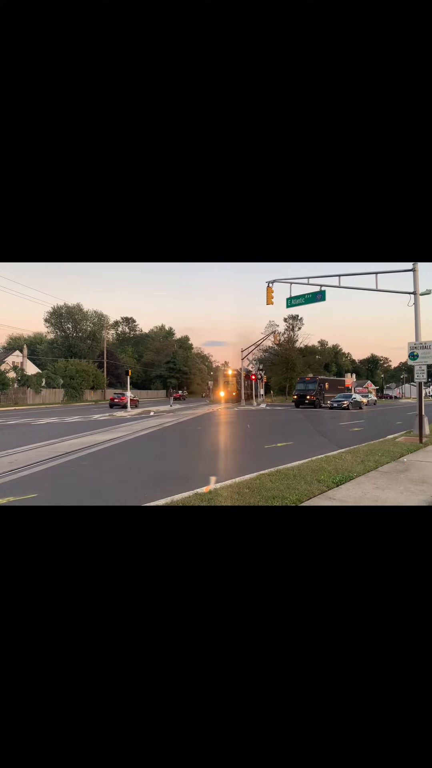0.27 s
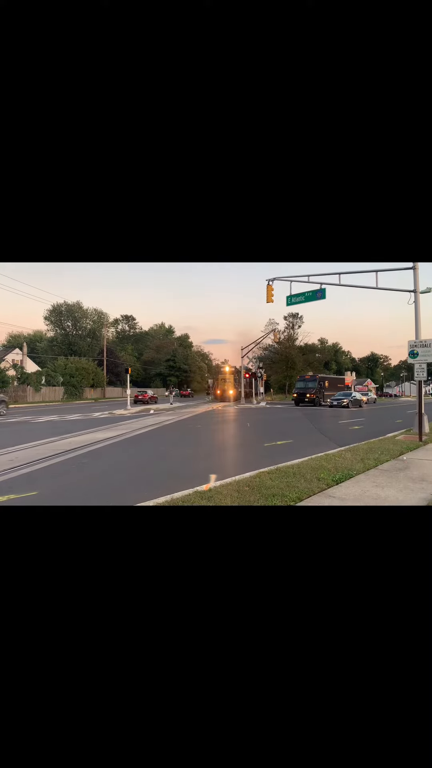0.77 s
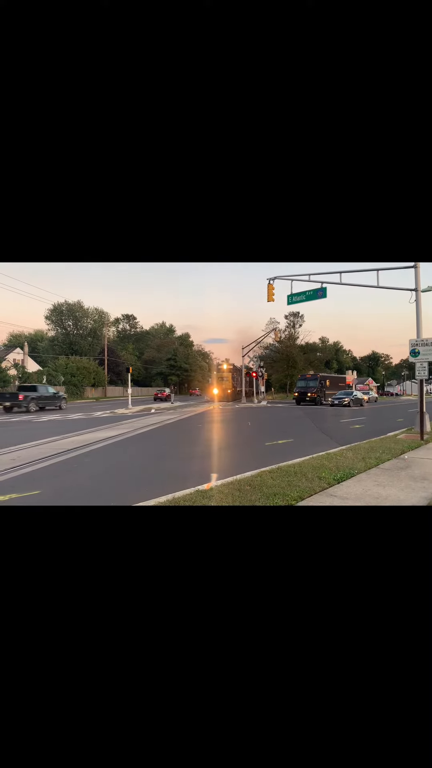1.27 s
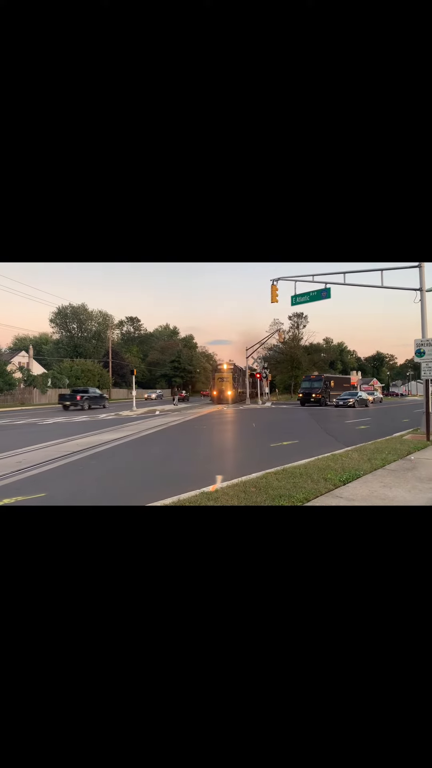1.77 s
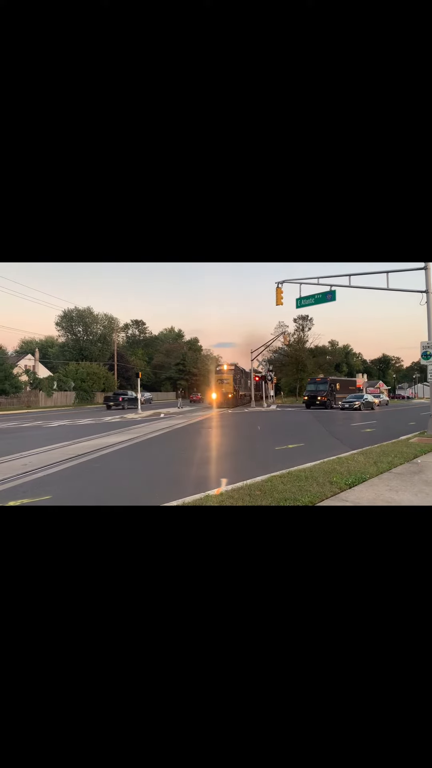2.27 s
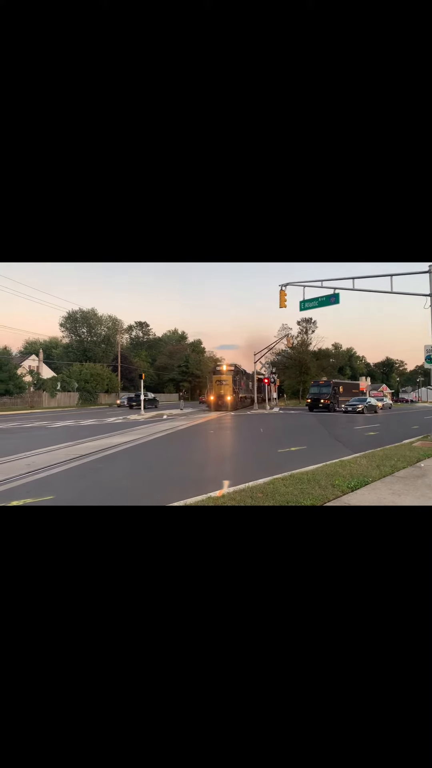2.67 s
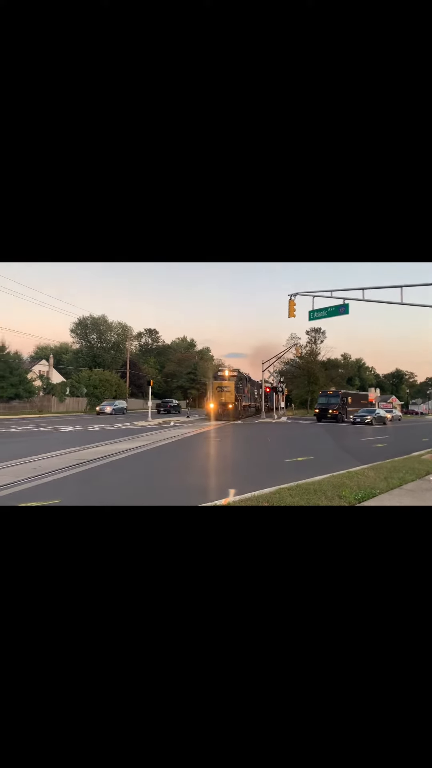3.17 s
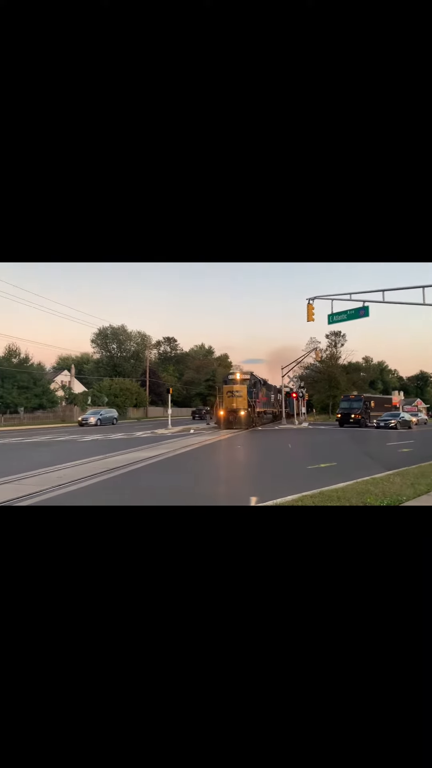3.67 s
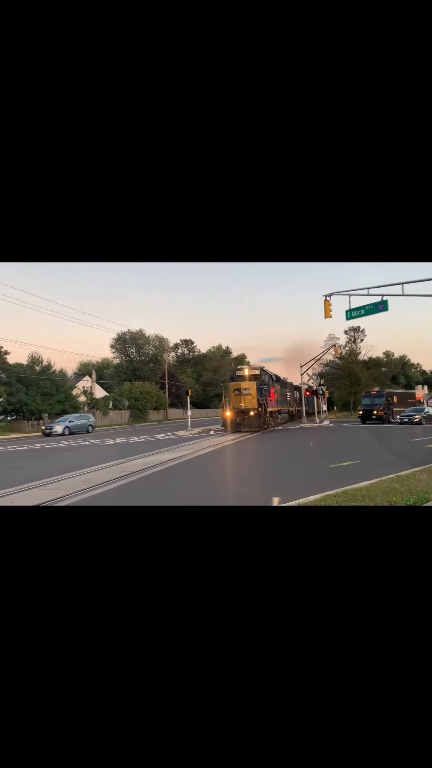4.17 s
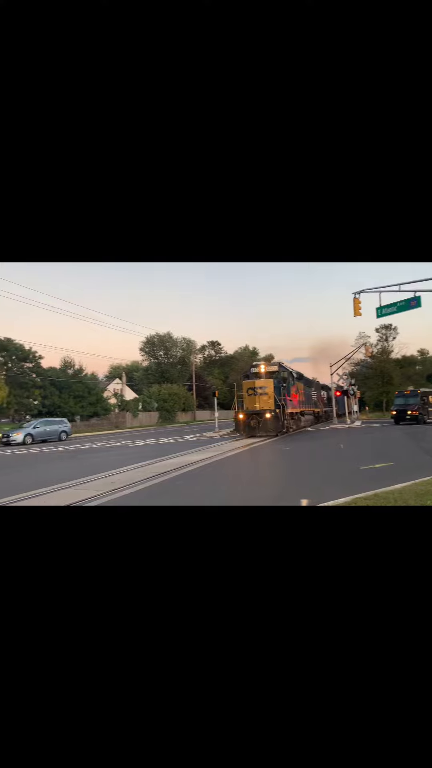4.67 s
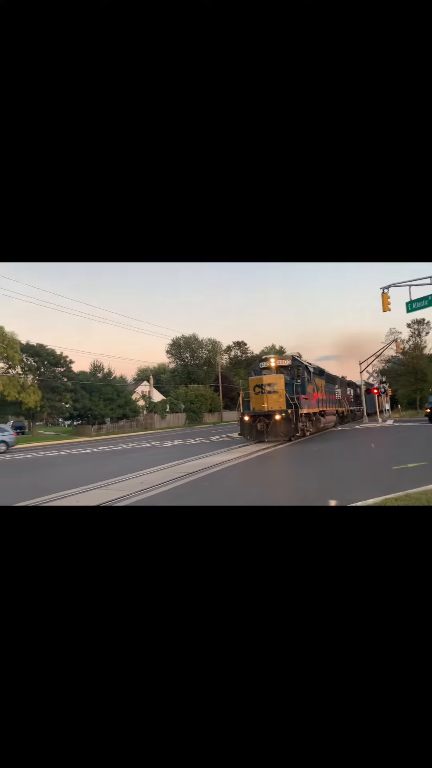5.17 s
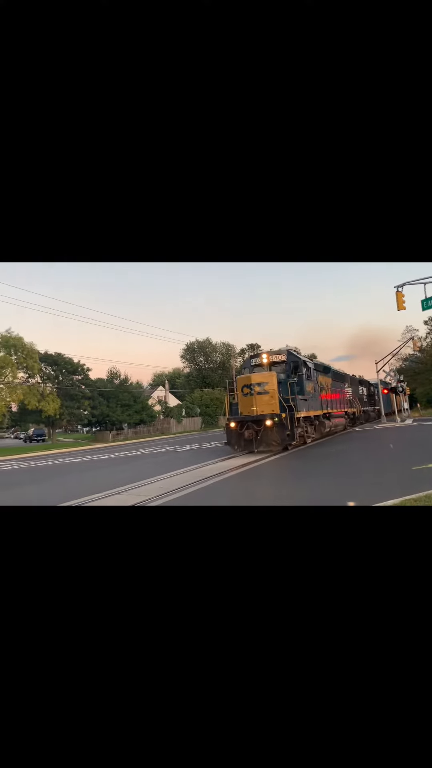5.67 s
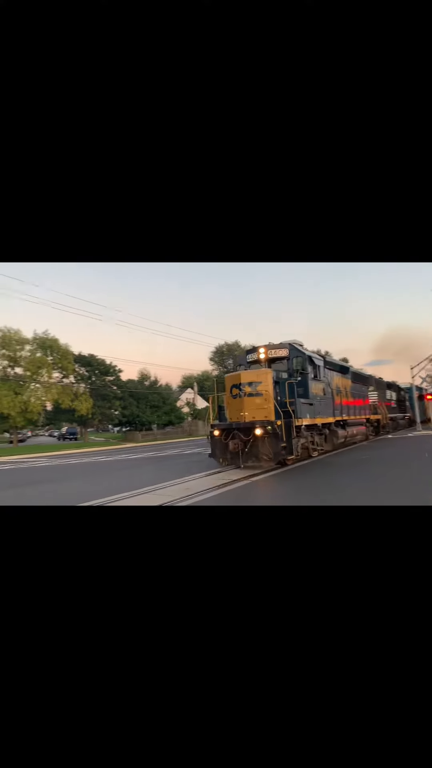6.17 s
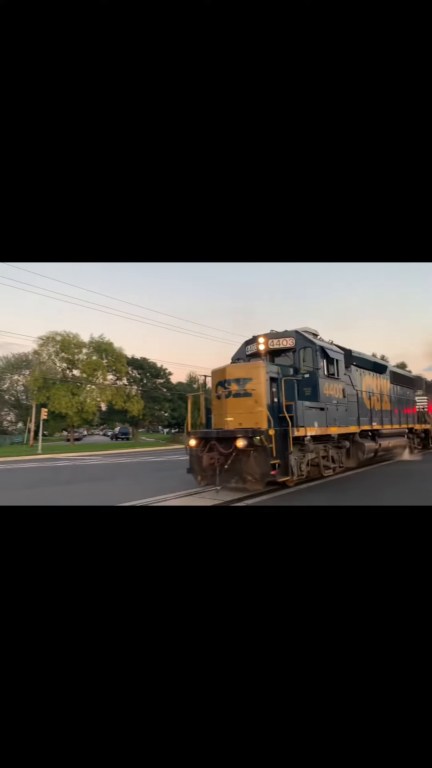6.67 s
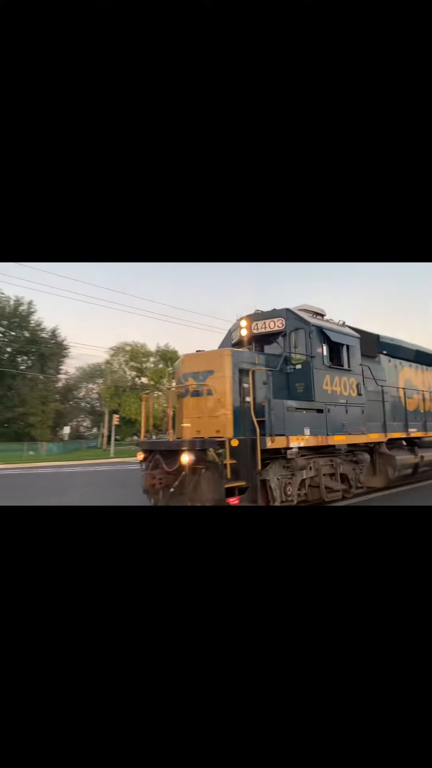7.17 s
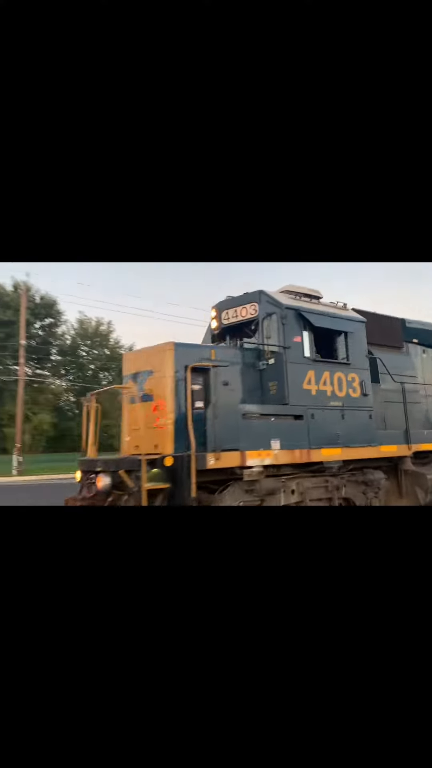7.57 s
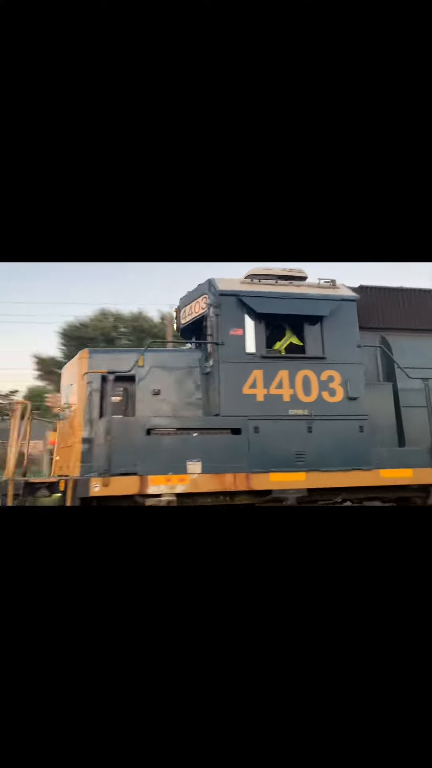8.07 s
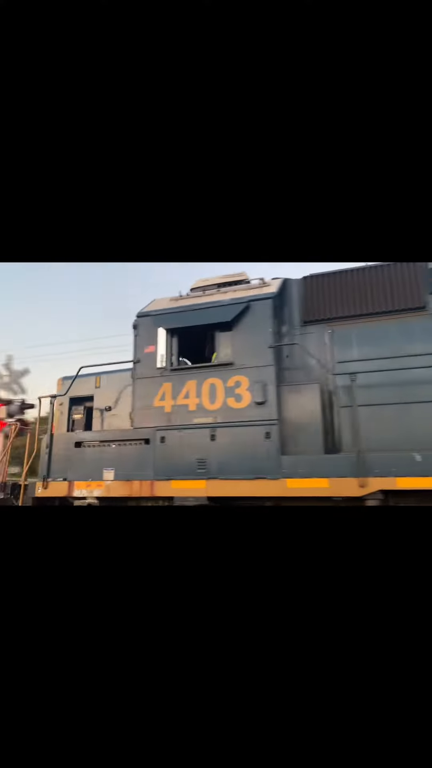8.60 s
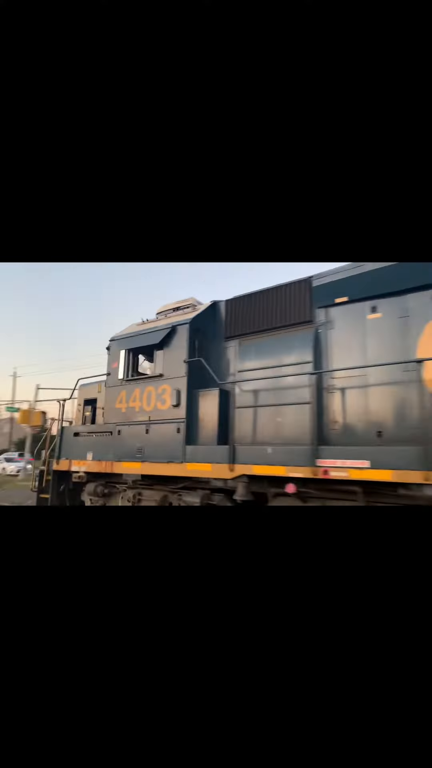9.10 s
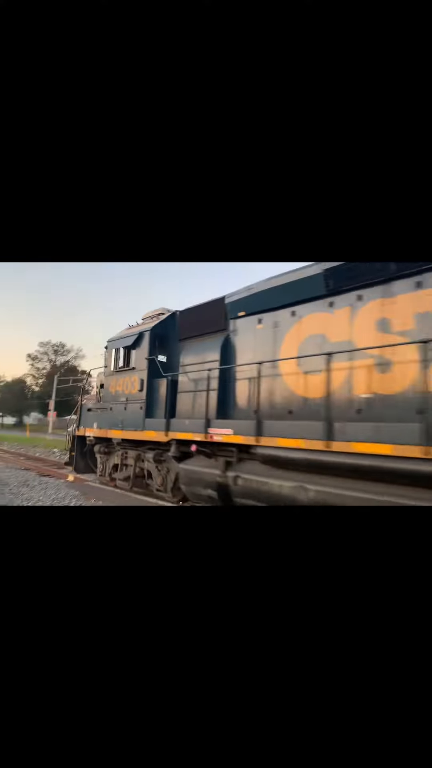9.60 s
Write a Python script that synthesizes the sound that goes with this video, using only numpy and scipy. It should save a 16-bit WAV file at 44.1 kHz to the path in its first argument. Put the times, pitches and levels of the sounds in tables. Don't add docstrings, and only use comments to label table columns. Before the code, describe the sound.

A diesel locomotive throbs closer with a short horn toot, tolling bell and crossing gongs, then a long chordal horn blast before rumbling past with hissing air.

```python
import sys
import numpy as np
from scipy import signal
from scipy.io import wavfile
from scipy.ndimage import uniform_filter1d

SR = 44100
rng = np.random.default_rng(int(sys.argv[2]) if len(sys.argv) > 2 else 0)


def invert_db(level):
    return 10 ** (np.asarray(level, dtype=float) / 20)


def wav_record(signal):
    frames = np.transpose(np.atleast_2d(signal))
    bounded = np.clip(frames, -1, 1)
    quanta = np.round(bounded * 32767).astype(np.int16)
    wavfile.write(sys.argv[1], SR, quanta)


N = 433944
T = np.arange(N) / SR


def evened(x):
    return x / np.sqrt(np.mean(abs(x) ** 2) + 1e-20)


def over_time(points, t):
    return np.interp(t, *np.transpose(points))


def read(points, hz):
    f, *values = np.transpose(points)
    return np.squeeze([np.interp(np.log(hz + 1), np.log(f), v) for v in values])


def joined(*levels_db):
    return 10 * np.log10(sum(invert_db(2 * db) for db in levels_db) + 1e-14)


def dying(t, s, db, db_per_s):
    return np.where(t < s, -120., db - db_per_s * (t - s))


def tone(hz, rough, width_hz):
    count = len(hz) // 32 + 2
    z = rng.standard_normal((count, 2)) + 1j * rng.standard_normal((count, 2))
    pole = np.exp(-np.pi * width_hz * 32 / SR)
    for _ in range(2):
        z = signal.lfilter([1], [1, -pole], z, axis=0)
    share = np.clip(rough, 0, 1)
    z = evened(z) * [np.sqrt(share), 1] + [np.sqrt(1 - share), 0]
    slow = np.array([np.interp(np.arange(len(hz)) / 32, np.arange(count), row) for row in z.T])
    phase_turns = np.cumsum(hz) / SR + rng.random()
    return np.sqrt(2) * (slow * np.exp(2j * np.pi * phase_turns)).real


# time in seconds, level in dB.
EXHAUST_LEVEL = [(0, -16), (.08, -14.5), (.45, -15), (2.6, -13.5), (3.45, -12), (4, -13.5), (4.9, -14),
                 (5.6, -6.5), (5.9, -7), (7.2, -7.5), (7.75, -7), (8.2, -6), (8.8, -5.5), (9.25, -7),
                 (9.56, -7), (9.84, -6)]


def train(t):
    exhaust_db = over_time(EXHAUST_LEVEL, t)
    near = np.interp(t, [6, 7.6], [0, 1])
    return exhaust_db, near, exhaust_db - 14 + 4 * near


# multiple of the cycle rate, level in dB.
EXHAUST_ORDERS = [(6, -30), (7, -19), (8, 0), (9, -10), (10, -15), (11, -13), (12, -26), (13, -9),
                  (14, -19), (15, -25), (16, -23), (17, -22), (21, -28), (24, -26), (30, -30)]
# time in seconds, rate in Hz.
FIRING = [
    (0, 65.7),
    (6.5, 65.8),
    (8, 64.8),
    (9.84, 64),
]
# start in seconds, end in seconds.
FRAME_BOOMS = [
    (7.25, 8.4),
    (9.15, 10),
]
# frequency in Hz, width in Hz, level in dB over the rumble.
WHINES = [(654.7, 19.7, -10), (1010, 2.7, -29)]


def engine():
    t = np.arange(N // 16 + 1) * 16 / SR
    fast_hz = 16 * over_time(FIRING, t)
    exhaust_db, near, _ = train(t)
    others_db = -4.5 * near
    lope_depth, lope_turns = 0.35, 0.89
    lope = lope_depth * np.cos(2 * np.pi * (np.cumsum(fast_hz / 8) / SR - lope_turns))
    orders = 0
    for order, db in EXHAUST_ORDERS:
        level = invert_db(db) * (1 + lope) if order == 8 else invert_db(db + others_db)
        orders = orders + level * tone(fast_hz * order / 8, rough=.07, width_hz=30.)
    booms = sum(np.clip(np.minimum(t - a, b - t) / 0.067, 0, 1) for a, b in FRAME_BOOMS)
    hum_db, hum_rest_db = -9, -12
    hum = invert_db(hum_db + hum_rest_db * (1 - booms)) * tone(2.12 * fast_hz, rough=0.91, width_hz=90.0)
    low = invert_db(exhaust_db) * (invert_db(1.4) * evened(orders) + hum)
    low = signal.resample_poly(low, 16, 1, axis=1)[:, :N]
    doppler = over_time(FIRING, T) / FIRING[0][1]
    whines = sum(invert_db(db) * tone(hz * doppler, rough=0.75, width_hz=width) for hz, width, db in WHINES)
    return low + invert_db(train(T)[2]) * whines


SHUT_DB_PER_S = 187.5


def blast_db(t, start, shut, db):
    attack_s, swell_db, swell_s = 0.034, 7, 0.31
    swell = np.clip((np.minimum(t, shut) - start) / swell_s, 0, 1)
    attack_db = -30 * np.clip(1 - (t - start) / attack_s, 0, 4)
    return db + attack_db + swell_db * swell, np.maximum(t - shut, 0)


WALL_S = .19


def release_db(after, tail_db):
    wall_db = -9.5 - 32 * after - SHUT_DB_PER_S * np.maximum(after - WALL_S, 0)
    return joined(-SHUT_DB_PER_S * after, wall_db, tail_db - 19 * after)


# start in seconds, valve shuts in seconds, level in dB, low fundamentals in dB,
# street tail in dB.
BLASTS = [
    (0.055, 0.165, -21.5, 1, -14.5),
    (3.435, 4.619, -13.5, -8, -19),
]
# scattered share 0-1, width in Hz.
SCATTER = [
    (.42, 15),
    (.1, 9),
]
# fundamental in Hz, levels of partials 1 to 5 in dB.
CHIMES = [(317.1, -14, 0.5, -14.5, -15, -25.5), (373.3, -9.5, -1, -21, -23.5, -27),
          (430.4, -11.5, -10.5, -18, -26, -26.5), (499.6, -8, -18, -16.5, -30, -27),
          (627.4, -2.5, -17.5, -18, -46, -41)]
# seconds into the blast, pitch factor.
ECHO_PITCH = [(0, .995), (.4, .98), (1.4, .968)]
# frequency in Hz, level in dB.
ECHO_COLOUR = [(300, -1), (700, -6), (1100, -4.5), (1460, 2.5), (1900, 3.5), (3000, -11)]
# time in seconds, level in dB.
SURGES = [(.16, 2), (.33, 5), (.43, 8), (.526, 12), (3.487, 2), (3.742, 4), (3.86, 6.5), (3.968, -0.5),
          (4.326, 3.5), (4.41, 1.5)]


def horn(start, shut, blast, low_db, tail_db, rough, width_hz):
    t = np.arange(start, shut + 0.54, 1 / SR)
    held_db, after = blast_db(t, start, shut, blast)
    level_db = held_db + release_db(after, tail_db)
    surge_db = sum(db * np.exp(-((t - s) / 0.02) ** 2) for s, db in SURGES)
    linger_db = 4.5 * np.clip(after / WALL_S * 2, 0, 1)
    age = t - t[0]
    pitch = 1 + 0.0266 * np.exp(-age / 0.065)
    late = over_time(ECHO_PITCH, age)
    onset = np.clip((age - .12) / 0.038, 0, 1)
    out = np.zeros((2, len(t)))
    for hz, *partials in CHIMES:
        brassy = [partials[-1] - 2.5 * n for n in (1, 2)]
        for k, db in enumerate(partials + brassy, 1):
            direct = tone(k * hz * pitch, rough, width_hz)
            echo_level = invert_db(read(ECHO_COLOUR, k * hz)) * onset
            echo = echo_level * tone(k * hz * late, rough=.35, width_hz=9.)
            lift_db = low_db + 7.5 + linger_db if k * hz < 560 else surge_db
            if k * hz > 900:
                lift_db = lift_db + 7 * np.exp(-age / 0.11)
            out += invert_db(db + lift_db) * (direct + echo)
    return t[0], invert_db(level_db - 3.0) * out * signal.windows.tukey(len(t), .02)


# time in seconds, level in dB, main mode in Hz, low mode in dB, high modes in dB.
STRIKES = [
    (0.432, -37, 2506, 4, -5),
    (1.2453, -39, 2500, 5, 5.5),
    (2.051, -32.5, 2506, 7, 1),
    (2.8589, -33.5, 2510, 9, 3),
    (3.6694, -32, 2494, -3, 0.0),
    (5.296, -19.5, 2517, -3.5, -2),
    (6.1211, -22, 2511, 2.5, -1),
    (6.935, -15, 2514, 0.5, 1),
    (7.7462, -14.5, 2508, 5, 5),
]
# frequency in Hz, level in dB, t60 in seconds.
BELL_MODES = [(1140, 0.5, 2.03), (2177, 5.5, 0.3), (2494, 8, 0.92), (3820, -10, 1.2), (4125, 0, 1.34),
              (6030, 10, 0.14), (6130, 1, 0.84), (6660, -7, 0.47), (8000, -5, 0.39), (8310, -0.5, 0.64),
              (9850, -15, 0.41), (10700, -9, 0.61), (13200, -14, .25), (14100, -20, 0.21)]


def bell(s, db, hz, low_db, high_db):
    t = np.arange(round(.85 * SR)) / SR
    facing_db = 0.96 * (s - 3)
    out = 0
    for f, mode_db, t60 in BELL_MODES:
        if f < 2000:
            colour_db, rise_s = low_db, .025
        else:
            colour_db, rise_s = high_db if f > 5000 else (f > 3000) * facing_db, .007
        ring = np.clip(t / rise_s, 0, 1) * invert_db(mode_db + colour_db - 60 * t / t60)
        out = out + ring * tone(f * hz / BELL_MODES[2][0] + 0 * t, rough=.26, width_hz=12.)
    return s, invert_db(db - 3) * out * np.clip((t[-1] - t) / .05, 0, 1)


def gong(modes, db, hold_s):
    t = np.arange(round(.45 * SR)) / SR
    ring = invert_db(db - 19.5 * t - 61 * np.maximum(t - hold_s, 0)) * np.clip(t / 0.0017, 0, 1)
    return ring * sum(invert_db(mode_db) * tone(hz + 0 * t, rough=0.05, width_hz=19.0) for hz, mode_db in modes)


# frequency in Hz, level in dB.
NEAR_GONG = [(1497, 2.5), (2024, -7.5), (2589, -4.5)]
# first beat in seconds, last beat in seconds, first level in dB, last level in dB.
NEAR_RUNS = [
    (-.12, 2.292, -38.5, -37.5),
    (2.7, 3.389, -36, -32.5),
    (5.149, 6.501, -39, -36.5),
]
# frequency in Hz, level in dB.
FAR_GONG = [(1550, 4), (2090, -2.5)]
# time in seconds, level in dB.
FAR_BEATS = [(.5 + k / 3, -46) for k in range(9)]


def crossing_gongs(mix):
    for first, last, *ends_db in NEAR_RUNS:
        count = round((last - first) / .344) + 1
        for s, db in zip(np.linspace(first, last, count), np.linspace(*ends_db, count)):
            add(mix, s, gong(NEAR_GONG, db, hold_s=0.17))
    for s, db in FAR_BEATS:
        add(mix, s, gong(FAR_GONG, db, hold_s=0.11))


def bump(db, hz, width_hz, t60):
    t = np.arange(round(.3 * SR)) / SR
    edges = np.clip([hz - width_hz / 2, hz + width_hz / 2], 30, SR / 2 - 99)
    band = signal.butter(2, edges, "band", fs=SR, output="sos")
    puff = signal.sosfilt(band, rng.standard_normal((2, len(t))))
    return invert_db(db - 60 * t / t60) * evened(puff) * np.clip(t / .008, 0, 1)


# time in seconds, level in dB,
# centre in Hz, width in Hz, t60 in seconds.
KNOCKS = [(2.636, -22.5, 910, 1490, 0.34), (2.647, -12, 450, 400, 0.11), (2.68, -22, 297, 400, 0.23),
          (2.692, -23, 248, 296, 0.056), (2.745, -23, 200, 300, 0.12), (1.83, -49, 7200, 250, 1.6),
          (1.83, -55, 8100, 250, 1.5), (1.83, -57, 9100, 250, 1.5), (1.722, -48, 11500, 3000, .03),
          (1.758, -50, 11400, 2980, .03), (1.795, -37, 11000, 3000, .04), (3.512, -27, 7500, 6000, .12),
          (3.6, -25, 7500, 5950, .15), (3.721, -23.5, 7500, 6000, 0.16), (4.2, -27, 8000, 6000, .1),
          (0.077, -38, 4260, 120, 0.23), (0.083, -33, 3820, 120, 0.2)]


def knocks(mix):
    for s, *row in KNOCKS:
        add(mix, s, bump(*row))


# time in seconds, level in dB.
AIR = [
    (6.585, -37.5),
    (6.68, -27),
    (6.86, -23),
    (7.44, -25.5),
    (8.2, -21.5),
    (8.62, -24),
    (9.3, -22.5),
    (9.84, -26),
]


def levels(t):
    exhaust_db, _, rumble_db = train(t)
    blasts = [blast_db(t, *row[:3]) for row in BLASTS]
    breath_db = joined(*(db - 44 * after for db, after in blasts))
    close_db = joined(*(db - SHUT_DB_PER_S * after for db, after in blasts))
    clapper_db = joined(*(dying(t, s, db, 110) for s, db, *_ in STRIKES))
    car_db = dying(t, 2.66, 0, 9)
    swish_db = -54.5 - 9 * ((t - 1.97) / 0.18) ** 2
    air_db = over_time(AIR, t)
    shut_db = -120 * (t < 6.585)
    spit_s = 6.67
    spit_db = -27 - 45 * np.maximum(t - spit_s, 9 * (spit_s - t))
    leak_db = dying(t, 4.6, -62.5, -6.5)
    roar_db = joined(-42 + 0.69 * exhaust_db, car_db - 48, breath_db - 29, clapper_db - 26)
    fizz_db = joined(-49.5 + exhaust_db, swish_db, close_db - 35.5, clapper_db - 22)
    blow_db = joined(-21 + 0.47 * air_db + shut_db, spit_db)
    hiss_db = joined(air_db + shut_db, leak_db)
    return joined(rumble_db, car_db - 26), roar_db, fizz_db, blow_db, hiss_db


# frequency in Hz, level in dB.
RUMBLE = [(25, -21), (45, -14.5), (70, 6.5), (130, -0.5), (250, -1), (450, -14), (800, -13.5),
          (1300, -31.5), (2200, -52), (6200, -63), (6650, -26), (6950, -31), (7400, -69), (9000, -83)]
ROAR = [(500, -22.5), (1000, 17.5), (1800, 11), (3000, 3), (4200, 2.5), (5500, -2.5), (7000, -4.5),
        (9000, -11), (12000, -61)]
FIZZ = [(4000, -21), (6000, 10.5), (8000, -2), (9600, 0), (11000, -4.5), (13000, -14), (14000, -22),
        (16000, -35)]
BLOW = [(500, -2), (1000, -2.5), (1850, 2.5), (3000, 5), (4200, 6), (5500, 8), (7000, 1.5), (9000, -39)]
HISS = [(3000, -16.5), (4500, -6), (6000, 2), (8500, 1.5), (10500, 1), (12500, 2), (14500, -1), (16000, -6)]


def washes():
    frames, hz = N // 256 + 5, np.fft.rfftfreq(1024, 1 / SR)
    t = np.minimum(np.arange(frames) * 256 / SR, T[-1])
    colours = (RUMBLE, -21.5), (ROAR, -30), (FIZZ, -32), (BLOW, -27), (HISS, -32)
    power = 0
    for (colour, per_hz_db), level_db in zip(colours, levels(t)):
        power = power + invert_db(2 * (read(colour, hz)[:, None] + per_hz_db + level_db))
    a, b, c, d, patches = rng.standard_normal((frames, 513, 5)).T
    patches = evened(uniform_filter1d(uniform_filter1d(patches, 12, 0), 14, 1))
    flicker = evened(uniform_filter1d(rng.standard_normal(frames), 8))
    drift = invert_db(0.67 * patches + 0.79 * flicker + 18)
    z = np.array([a + 1j * b, c + 1j * d]) * np.sqrt(power) * drift
    return signal.istft(z, nperseg=1024, noverlap=768)[1][:, :N]


def add(mix, s, sound):
    at = round(s * SR)
    sound = sound[:, max(-at, 0):N - at]
    mix[:, max(at, 0):max(at, 0) + sound.shape[1]] += sound


def scene():
    mix = engine() + washes()
    for row, scatter in zip(BLASTS, SCATTER):
        add(mix, *horn(*row, *scatter))
    for row in STRIKES:
        add(mix, *bell(*row))
    crossing_gongs(mix)
    knocks(mix)
    return mix


def gain_db(t):
    return -14 * np.clip((t - 3.407) / 0.42, 0, 1) + 1.2 * np.maximum(t - 5.44, 0)


# frequency in Hz, right lag in rad, share of the bearing, likeness 0-1,
# left-right balance in dB.
PORTS = [(60, .03, 0, 1, -.8), (170, 0, 0, .995, -1.9), (300, -.15, 0, .96, -3), (550, .25, 0, .94, -5),
         (1200, .1, 0, .92, -.5), (2000, .3, .2, .75, -1), (3500, 2, 1, .85, -.5),
         (4300, 1.8, -.5, .66, -.5), (5200, 3.14, -.22, .84, 0), (6800, 4.9, 0, .8, 0),
         (7800, 5.95, 0, .93, 0), (9400, 6.65, 0, .93, 0), (10400, 7.9, 0, .7, 0), (11400, 9., 0, .9, 0),
         (13200, 9.8, 0, .9, 0), (14100, 11., 0, .65, 0), (15200, 12.3, 0, .93, 0)]
# time in seconds, lag in rad.
BEARING = [
    (0, 0.39),
    (6.3, 0.1),
    (6.7, -0.21),
    (7.4, -1.5),
    (7.8, -0.54),
    (8.2, 0.77),
    (9.4, 1.48),
    (9.55, -0.016),
    (9.84, -1.4),
]


def ports(straight, scattered, hz, t):
    lag, share, likeness, balance_db = read(PORTS, hz)[:, :, None]
    lag = lag + share * over_time(BEARING, t)
    likeness = likeness - .14 * (1 - train(t)[1]) * (hz[:, None] > 2500)
    common, apart = np.sqrt((1 + likeness) / 2) * straight, np.sqrt((1 - likeness) / 2) * scattered
    left = (common + apart) * invert_db(balance_db / 2)
    right = (common - apart) * invert_db(-balance_db / 2) * np.exp(-1j * lag)
    return left, right


def thinned(left, right, hz):
    both = np.array([left + right, left - right])[:, :512] / 2
    power = (abs(both) ** 2).reshape(2, 64, 8, -1).mean(2)
    power = uniform_filter1d(power, size=7, axis=2).repeat(8, axis=1)
    hz = hz[:512, None]
    weak = (power < power[::-1] * invert_db(2 * -8.)) & (hz > 2100)
    floor_db = read([(10000, -120), (11200, -103), (16000, -97)], hz)[:, None]
    faint = abs(both) < invert_db(floor_db)
    both = np.pad(both * ~(weak | faint | (hz > 15750)), ((0, 0), (0, 1), (0, 0)))
    return np.array([both[0] + both[1], both[0] - both[1]])


def low_pass(x):
    return signal.sosfilt(signal.butter(12, 16990, fs=SR, output="sos"), x)


def record(dry):
    ducked = dry * invert_db(gain_db(T))
    hz, t, (straight, scattered) = signal.stft(ducked, SR, nperseg=1024, noverlap=768)
    left, right = ports(straight, scattered, hz, t)
    pair = signal.istft(thinned(left, right, hz), SR, nperseg=1024, noverlap=768)[1][:, :N]
    soft = np.sign(pair) * (.7 + .25 * np.tanh((abs(pair) - .7) / .25))
    pair = np.where(abs(pair) < .7, pair, soft)
    return low_pass(pair)


dry = scene()
out = record(dry)
wav_record(out)
```